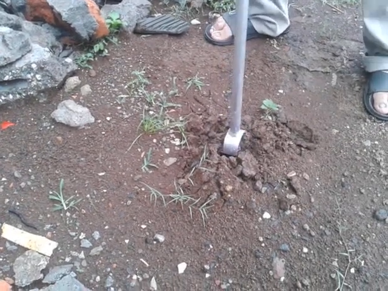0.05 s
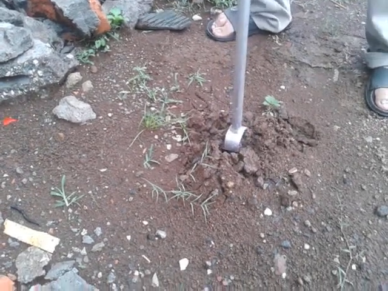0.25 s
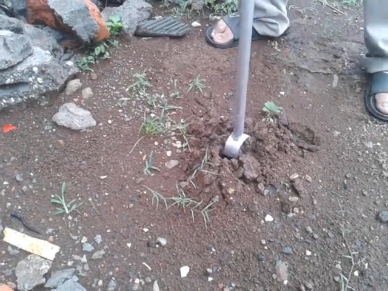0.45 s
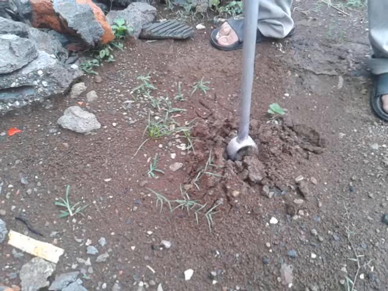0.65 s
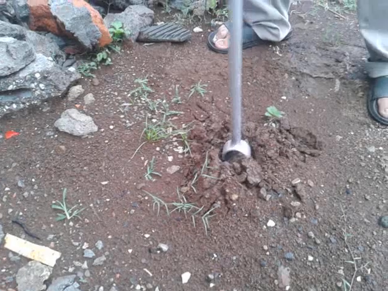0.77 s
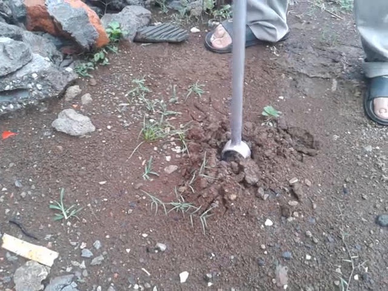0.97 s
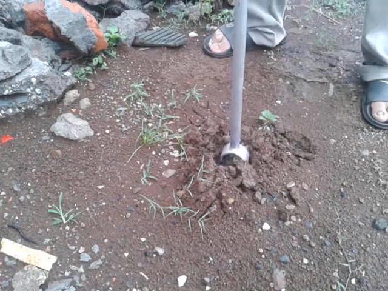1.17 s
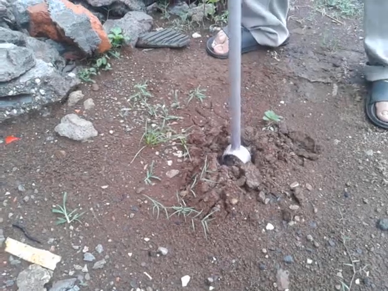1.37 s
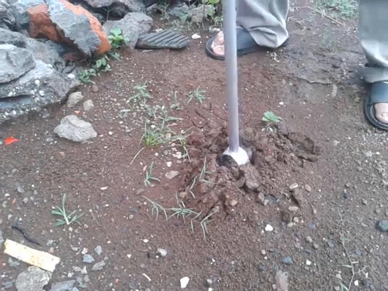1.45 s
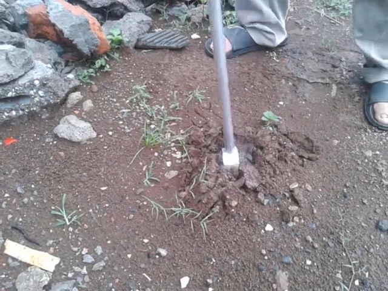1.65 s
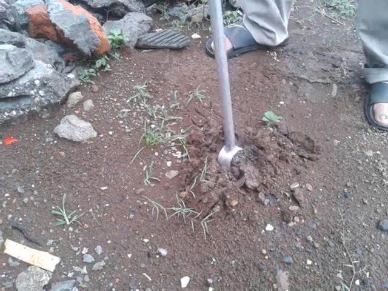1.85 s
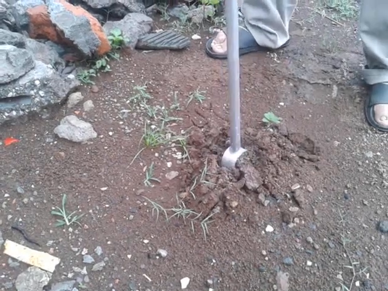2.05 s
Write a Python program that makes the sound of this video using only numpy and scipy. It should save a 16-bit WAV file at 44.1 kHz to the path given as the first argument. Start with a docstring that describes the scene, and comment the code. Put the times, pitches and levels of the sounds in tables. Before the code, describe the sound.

A steel hand auger crunches and scrapes through loose stony soil, over a steady outdoor hiss.

```python
"""Outdoors, close to a steel hand auger twisted into loose, stony soil, over a steady hiss.
Narrow tones colour the filtered noise of the hiss; bright resonances turn slips into ticks and creaks.
Random grains crunch as earth in two short turns, then scrape over grit in a longer one and knock a stone.
The digging force rings the modes of the shaft faintly; unsteady sines make its squeaks and thin singing."""
import sys
import numpy as np
from scipy import signal
from scipy.fft import rfft, irfft, next_fast_len
from scipy.io import wavfile

SR = 44100
rng = np.random.default_rng(int(sys.argv[2]) if len(sys.argv) > 2 else 0)


def output_pcm(signal):
    """Save a mono or channel-first signal as 16-bit PCM at the path in sys.argv[1].

    Samples are clipped to [-1, 1] before scaling.
    """
    pcm = np.clip(np.atleast_2d(signal).T, -1, 1) * 32767
    wavfile.write(sys.argv[1], SR, np.round(pcm).astype(np.int16))


N = 92610
TIME = np.arange(N) / SR


def from_db(db):
    """Decibels to amplitude gain."""
    return 10 ** (np.asarray(db) / 20)


def rms_one(x):
    """Scale to rms 1."""
    return x / np.sqrt(np.mean(x ** 2) + 1e-20)


def level(rows):
    """Gain over time from (time_s, level_db) points, held before the first and after the last."""
    return from_db(np.interp(TIME, *np.transpose(rows)))


def colour(x, points):
    """Minimum-phase filter through (frequency_hz, gain_db) points, scaled to unit power gain."""
    size = 2 * next_fast_len(N)
    hz, db = np.transpose(points)
    bin_hz = np.arange(size // 2 + 1) * SR / size
    gain = rms_one(from_db(np.interp(np.log(bin_hz + 1), np.log(hz), db)))
    # folding the cepstrum onto positive time makes the filter causal
    cepstrum = irfft(np.log(gain))[:size // 2]
    cepstrum[1:] *= 2
    response = np.exp(rfft(cepstrum, size))
    return irfft(rfft(x, size) * response)[:N]


def split(x, hz):
    """The parts below and above a frequency, which add up to the whole."""
    low = signal.sosfilt(signal.butter(1, hz, fs=SR, output="sos"), x)
    return low, x - low


def ring(x, hz, t60):
    """A two-pole resonance: a unit click sets a sine of height 1 ringing, down 60 dB after t60 seconds."""
    decay = from_db(-60 / (t60 * SR))  # per sample
    turn = 2 * np.pi * hz / SR  # radians per sample
    return signal.lfilter([0, np.sin(turn)], [1, -2 * decay * np.cos(turn), decay * decay], x + 1e-18)


def narrow_noise(hz, width_hz):
    """Noise in one narrow band, rms 1."""
    edges = [hz - width_hz / 2, hz + width_hz / 2]
    band = signal.butter(2, edges, "band", fs=SR, output="sos")
    return rms_one(signal.sosfilt(band, rng.standard_normal(N)))


def grains(per_s, spread_db):
    """Random clicks of either sign and uneven size, rms 1."""
    sizes = from_db(spread_db * np.minimum(rng.exponential(1, N), 4))
    signs = rng.choice([-1, 1], N)
    struck = rng.random(N) < per_s / SR
    return rms_one(sizes * signs * struck)


def wander(per_s):
    """Random motion slower than a given rate, rms 1."""
    slow = signal.butter(2, per_s, fs=SR, output="sos")
    return rms_one(signal.sosfilt(slow, rng.standard_normal(N)))


def wavering(hz):
    """Unsteady contact makes a note of the steel waver in pitch; rms 1."""
    pitch_hz = hz + 6 * wander(60)
    return rms_one(np.sin(2 * np.pi * np.cumsum(pitch_hz) / SR))


def hiss():
    """Steady coloured noise with a few narrow tones; its bass and treble swell slightly."""
    # spectrum of the noise, relative: frequency_hz, density_db (per Hz)
    spectrum = [(35, -40.5), (65, -21.5), (122, -23), (141, -4), (183, -8), (360, 0.5), (500, 0),
                (975, -7.5), (1800, -12), (2300, -7), (2600, -10.5), (4300, -11), (7000, -4), (9100, -13.5),
                (15400, -120)]
    # narrow tones, before the swells: pitch_hz, width_hz, level_db
    tone_bands = [(143.4, 7.9, -68.5), (212, 33.6, -56.5), (1424, 17, -64.5), (2864, 220, -57),
                  (3990, 18, -62), (6030, 21, -59.5), (6785, 140, -55.5)]
    # swell of the bass: time_s, gain_db
    bass_swell = [(.27, -3.5), (.38, 1), (.6, 1), (1.2, -0.5), (2.1, -1)]
    # swell of the treble: time_s, gain_db
    treble_swell = [(0, 4.2), (.18, 3.1), (.35, 5.3), (.55, 3.5), (.9, 2.7), (1.1, 4.2), (1.38, 2.2),
                    (1.8, 6.4), (2.1, 5.8)]
    noise_db, bass_below_hz, treble_above_hz = -42, 900, 4470
    tones = sum(from_db(db) * narrow_noise(hz, width) for hz, width, db in tone_bands)
    noise = from_db(noise_db) * colour(rng.standard_normal(N), spectrum)
    bass, rest = split(noise + tones, bass_below_hz)
    middle, treble = split(rest, treble_above_hz)
    return bass * level(bass_swell) + middle + treble * level(treble_swell)


def ticks():
    """Single slips of the tool, and a fine creak around them, sound through the same bright resonance."""
    # sharp slips, before the resonance: start_s, level_db
    sharp_slips = [(0.213, -14.5), (0.2175, -13.5), (0.2203, 1.5), (0.2215, -9), (0.2239, 12),
                   (0.2395, -3.5), (.2936, -6), (0.2964, 7.5)]
    # fine creaking, before the resonance: time_s, level_db
    creak_level = [(.195, -62), (.207, -34.5), (.222, -32), (.234, -38), (.239, -32), (.25, -56.5),
                   (.275, -32.5), (.295, -41), (.31, -52.5)]
    # mostly one high resonance: frequency_hz, gain_db (relative)
    resonance = [(150, -50.5), (600, -35), (2000, -27.5), (3600, -17.5), (5100, -2.5), (6000, -3.5),
                 (6650, 7.5), (7700, -9.5)]
    creaking = (TIME > creak_level[0][0]) & (TIME < creak_level[-1][0])
    slips = creaking * level(creak_level) * grains(per_s=5500, spread_db=6.0)
    for start_s, db in sharp_slips:
        slips[int(start_s * SR)] += from_db(db)
    return colour(slips, resonance)


def digging():
    """Grinding and cracks, clumpy in soft soil, then an even rasp on stone; both set the shaft ringing."""
    # blade grinding through soil, before the digging gain: time_s, level_db
    grind_level = [(0, -89.5), (.3, -47), (.335, -42), (.45, -48.5), (.58, -47), (.645, -36), (.68, -43),
                   (.79, -48.5), (.85, -38.5), (.89, -40), (.94, -57), (1.41, -55), (1.465, -40.5),
                   (1.5, -45.5), (1.545, -36), (1.575, -45.5), (1.645, -44.5), (1.668, -39), (1.71, -36.5),
                   (1.74, -32.5), (1.775, -34), (1.82, -42), (1.92, -45.5), (2.1, -57)]
    # colour of crumbling soil: frequency_hz, density_db (per Hz, relative)
    soil_colour = [(90, -56.5), (200, -12.5), (450, -7), (950, -3), (1850, -5), (2900, -7.5), (5000, -1),
                   (6200, 0), (7200, -3)]
    # colour of steel on stone: frequency_hz, density_db (per Hz, relative)
    stone_colour = [(90, -42), (220, -1.5), (450, 4.5), (980, 6.5), (1500, 0), (2200, 4.5), (3350, 6.5),
                    (4400, 0.5), (5100, 4.5), (5650, 3.5), (6800, 5.5)]
    stone_from_s, stone_full_s = 1.47, 1.65
    clump_db, clumps_per_s = 2.4, 170  # how much the grains bunch in soft soil
    dig_db, stone_db, soil_on_shaft_db = 5, 1.5, -15.5  # soft soil drives the shaft only weakly
    stony = np.clip((TIME - stone_from_s) / (stone_full_s - stone_from_s), 0, 1)
    clumps = from_db(clump_db * (1 - stony) * wander(clumps_per_s))
    grinding = level(grind_level) * rms_one(grains(per_s=3000, spread_db=2) * clumps)
    force = from_db(dig_db) * (grinding + cracks())
    soil, stone = force * (1 - stony), force * stony
    contact = colour(soil, soil_colour) + from_db(stone_db) * colour(stone, stone_colour)
    return contact + shaft(stone + from_db(soil_on_shaft_db) * soil)


def cracks():
    """Each crumb or stone snaps, then collapses in a dying shower of grains with a short ring of its own."""
    # crumbs and stones giving way, before the digging gain:
    # start_s, level_db, t60_s, ring_db (before halving), ring_pitch_hz
    collapses = [(0.5986, -29, .022, -2, 4800), (.6075, -30.5, .014, -5, 6400),
                 (0.622, -33.5, 0.024, 2, 1350), (.635, -28.5, .022, 2, 960),
                 (0.64, -32.5, 0.023, 2.5, 1710), (.6475, -27.5, 0.026, -2, 4860),
                 (.659, -33, .022, -2, 970), (0.8216, -34.5, 0.022, 11, 5540), (.872, -36.5, .018, 6, 5730),
                 (1.4228, -38.5, .025, 1, 2850), (1.437, -46.5, 0.05, 15, 500),
                 (1.457, -35.5, .02, 2, 5900), (1.511, -32.5, 0.011, 5, 5940),
                 (1.5342, -38, 0.016, 0.5, 707), (1.553, -38, 0.021, 5, 1880),
                 (1.590, -35.5, 0.017, 1, 2220), (1.629, -37.5, .018, 0, 2250),
                 (1.6558, -30.5, 0.029, 2, 2250), (1.664, -36, .014, 0, 1890), (1.691, -30, .018, -6, 2180),
                 (1.7188, -26, 0.03, 3, 403), (1.726, -18, 0.033, -7.5, 2900),
                 (1.738, -27, 0.033, -0.5, 1000), (1.771, -33, .025, 0, 785),
                 (1.7915, -27, .02, -0.5, 6560)]
    bright_above_hz, hollow_cycles, snap_db = 1300, 9.6, 10
    shower = grains(16000, spread_db=-1.7)
    bright = split(shower, bright_above_hz)[1]
    out = np.zeros(N)
    for start_s, db, t60, hollow_db, hz in collapses:
        fall = from_db(-60 * np.maximum(TIME - start_s, 0) / t60)
        # the ring falls 60 dB in a fixed number of cycles
        hollow = .5 * rms_one(ring(shower, hz, hollow_cycles / hz))
        out += (TIME >= start_s) * from_db(db) * fall * (bright + from_db(hollow_db) * hollow)
        out[int(start_s * SR)] += from_db(db + snap_db)
    return out


def shaft(force):
    """Each mode stores the energy of the grains that strike it and lets it die away."""
    # modes of the steel shaft: pitch_hz, gain_db (relative to the force), t60_s
    modes = [(988, -57.5, 0.2), (2205, -51.5, 0.41), (2270, -55.5, .25), (2710, -66, 0.9),
             (3530, -58.5, .25), (3795, -57, 0.22), (5126, -52, .55), (5593, -64, .9), (6976, -53, .2)]
    out = 0
    for hz, db, t60 in modes:
        # energy falls as amplitude squared, hence 120
        energy = signal.lfilter([.5], [1, -from_db(-120 / (t60 * SR))], force ** 2)
        out = out + from_db(db) * np.sqrt(energy) * wavering(hz)
    return out


def squeaks():
    """Brief high squeals as the blade slips off grit, each an unsteady sine in a bell-shaped swell."""
    # squeals: centre_s, half_length_s (to 1/e of the peak), pitch_hz, level_db
    squeals = [(1.4745, 0.0054, 4140, -40), (1.632, 0.0032, 6950, -38), (1.673, 0.016, 6990, -39.5),
               (1.73, 0.0046, 6994, -21.5)]
    out = 0
    for centre_s, half_length_s, hz, db in squeals:
        swell = np.exp(-((TIME - centre_s) / half_length_s) ** 2)
        out = out + from_db(db) * swell * wavering(hz)
    return out


def singing():
    """Friction keeps one mode singing: a thin metallic note, very faint until it swells on the stone."""
    # the sung note: time_s, level_db
    note_level = [(1.47, -56), (1.512, -50), (1.55, -59), (1.655, -51), (1.675, -36.5), (1.70, -52),
                  (1.735, -37.5), (1.78, -48.5), (1.845, -47), (1.95, -68)]
    return level(note_level) * wavering(3424)


def scene():
    """The auger close by, in the open air."""
    return (hiss() + ticks() + digging() + squeaks() + singing())[None]


def record(dry):
    """A narrow-band microphone with a steep top edge; a little treble leaks past, up to a second edge."""
    mic_top_hz, mic_stop_db = 7060, 56
    leak_above_hz, leak_db, cutoff_hz = 7690, -28, 9100
    mic_edge = signal.ellip(6, 1, mic_stop_db, mic_top_hz, fs=SR, output="sos")
    leak_edge = signal.butter(4, leak_above_hz, "high", fs=SR, output="sos")
    final_edge = signal.ellip(10, .5, 70, cutoff_hz, fs=SR, output="sos")
    mic = signal.sosfilt(mic_edge, dry)
    leak = from_db(leak_db) * signal.sosfilt(leak_edge, dry)
    return signal.sosfilt(final_edge, mic + leak)


dry = scene()
out = record(dry)
output_pcm(out)
```